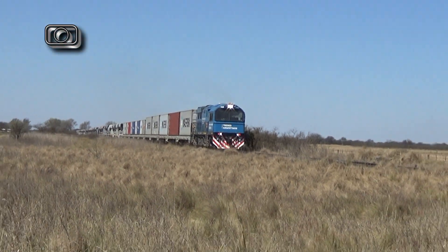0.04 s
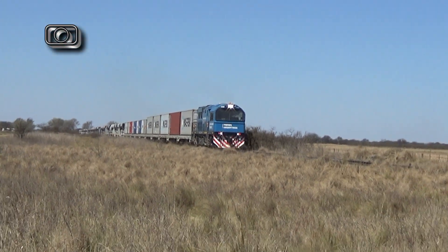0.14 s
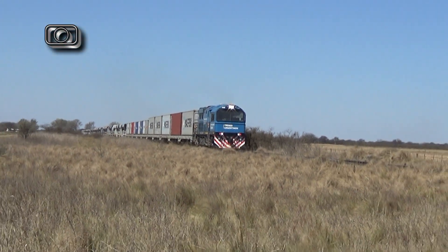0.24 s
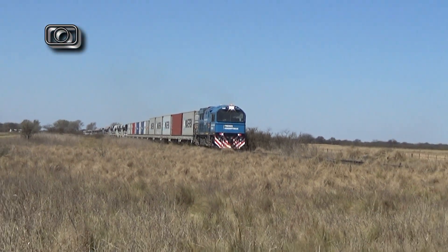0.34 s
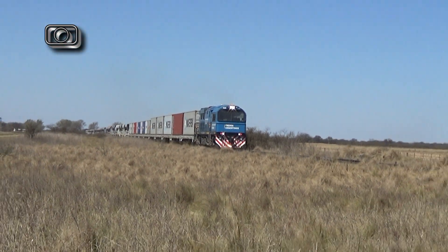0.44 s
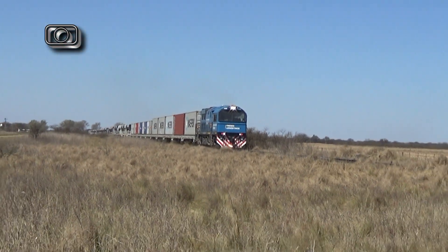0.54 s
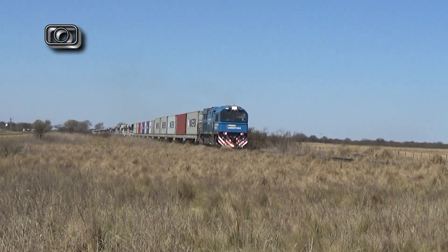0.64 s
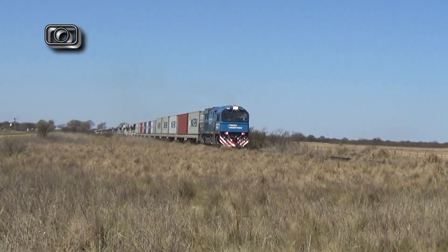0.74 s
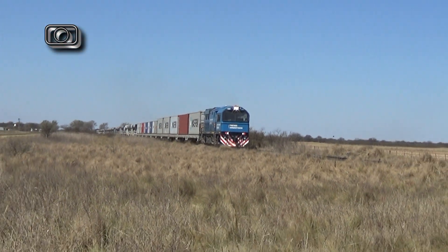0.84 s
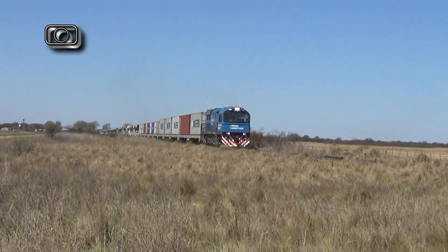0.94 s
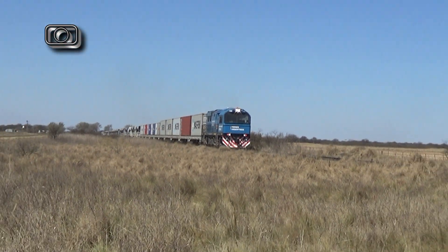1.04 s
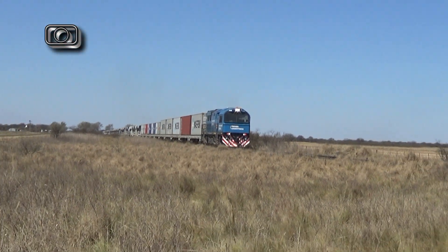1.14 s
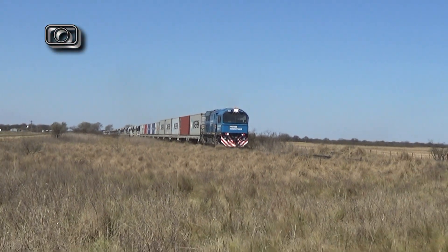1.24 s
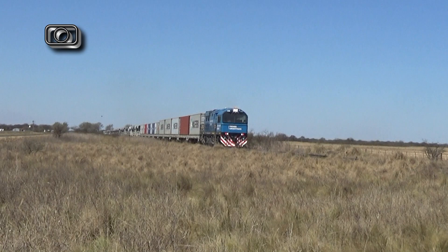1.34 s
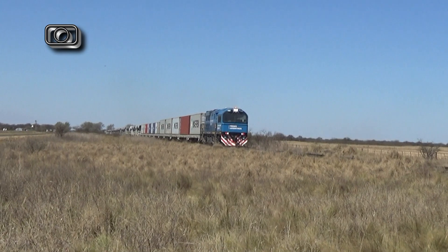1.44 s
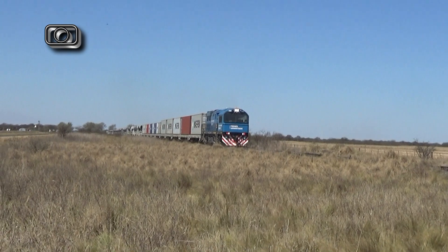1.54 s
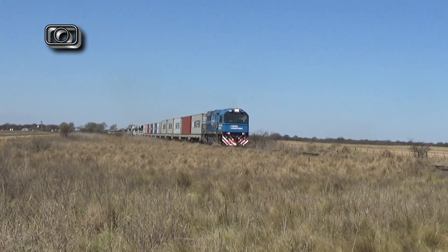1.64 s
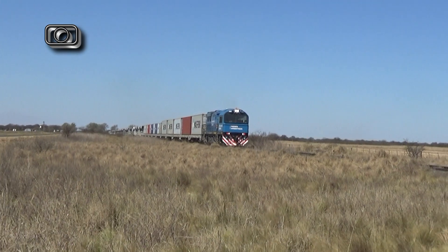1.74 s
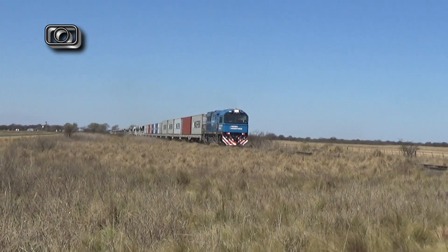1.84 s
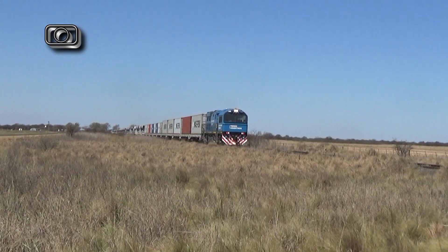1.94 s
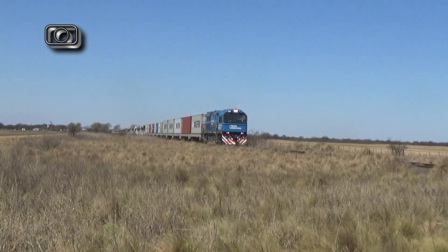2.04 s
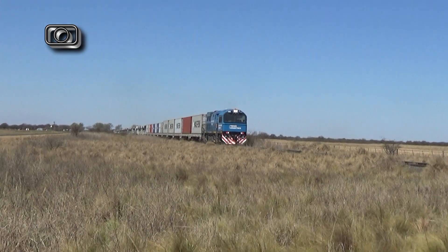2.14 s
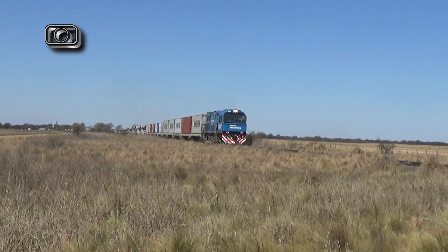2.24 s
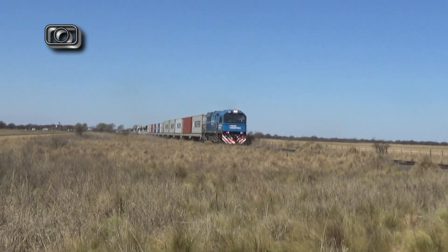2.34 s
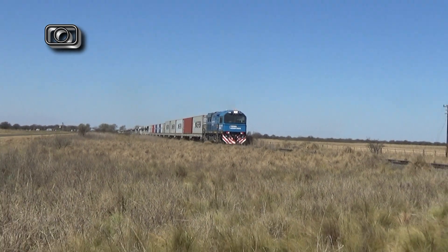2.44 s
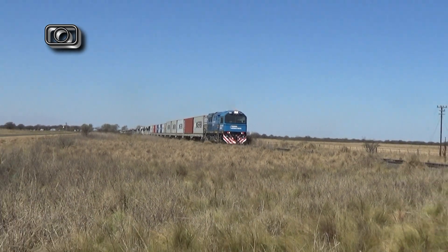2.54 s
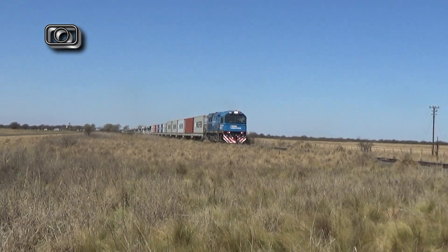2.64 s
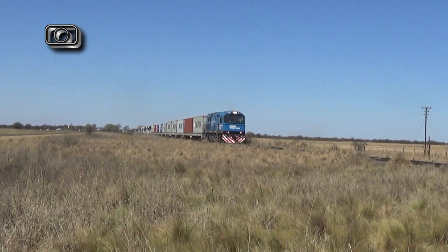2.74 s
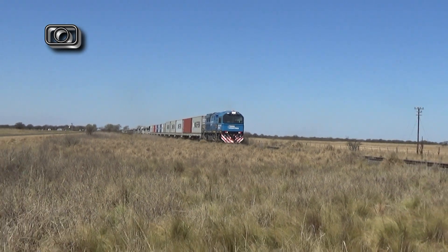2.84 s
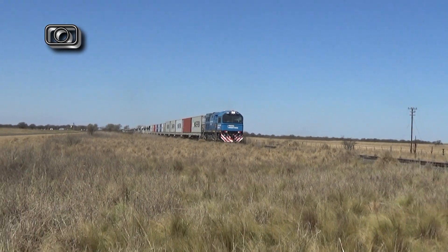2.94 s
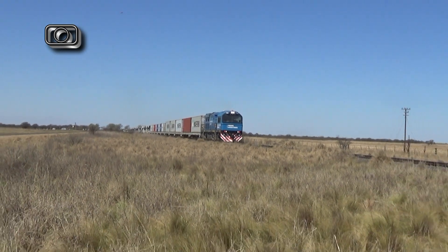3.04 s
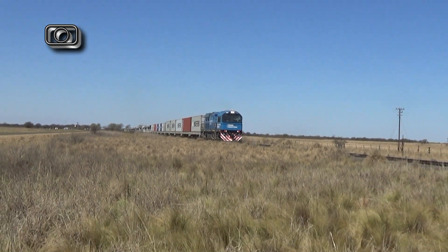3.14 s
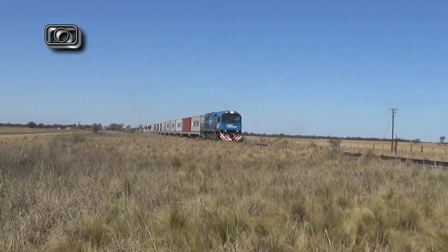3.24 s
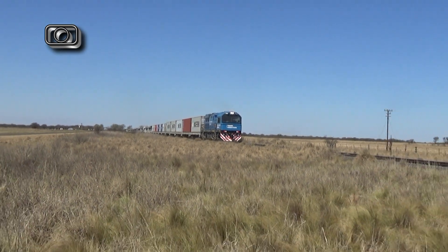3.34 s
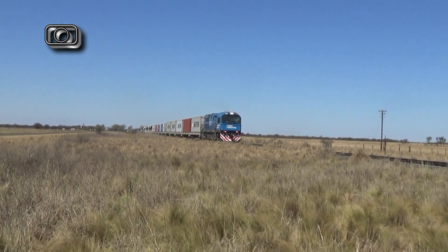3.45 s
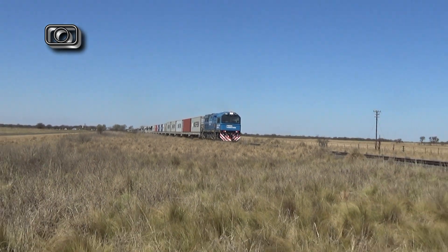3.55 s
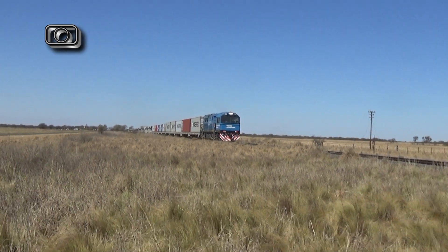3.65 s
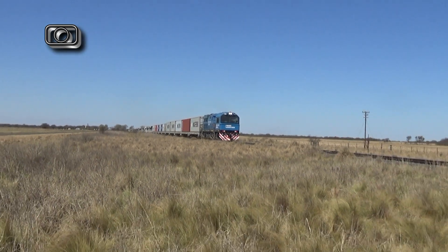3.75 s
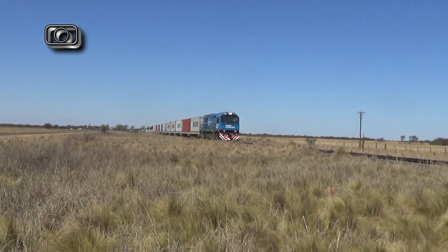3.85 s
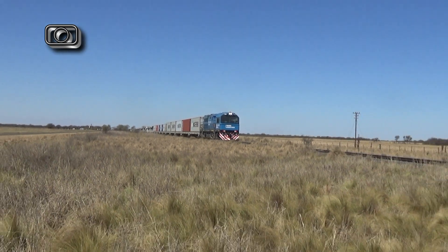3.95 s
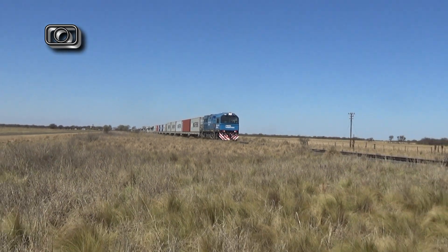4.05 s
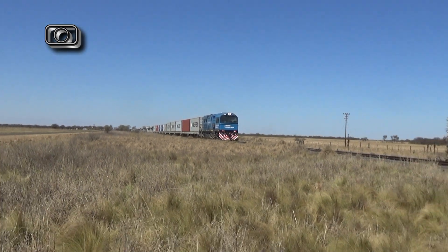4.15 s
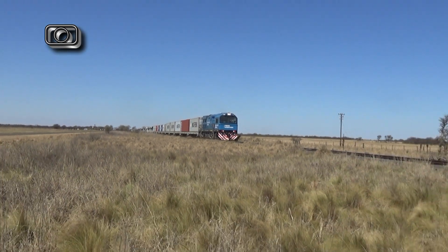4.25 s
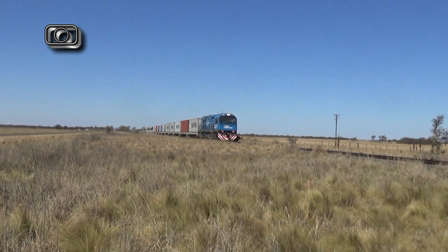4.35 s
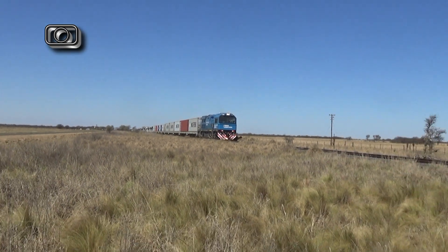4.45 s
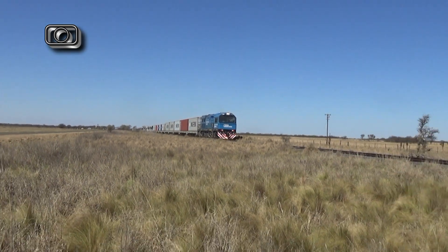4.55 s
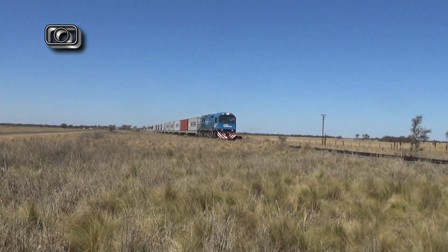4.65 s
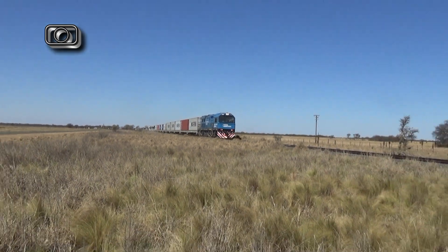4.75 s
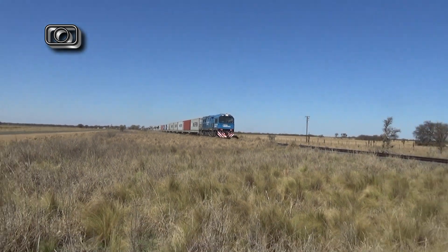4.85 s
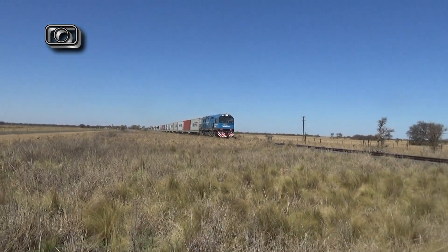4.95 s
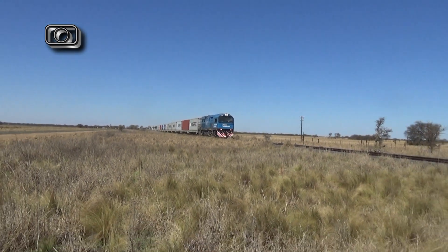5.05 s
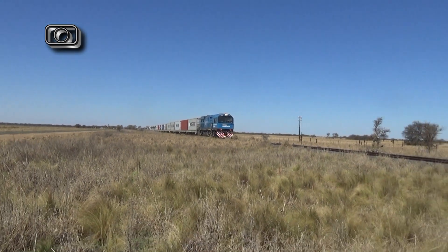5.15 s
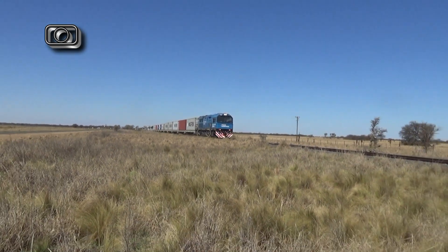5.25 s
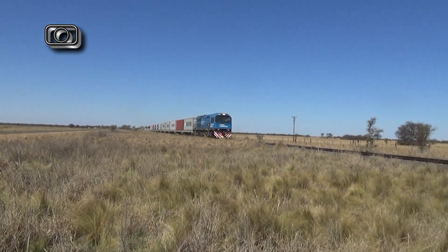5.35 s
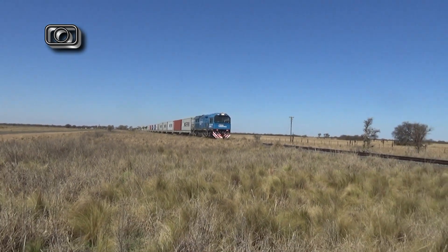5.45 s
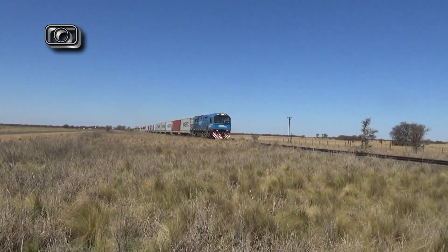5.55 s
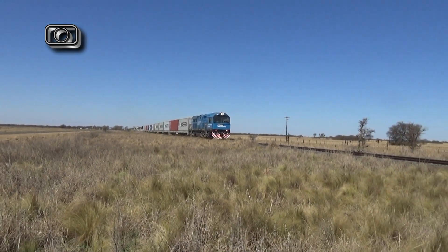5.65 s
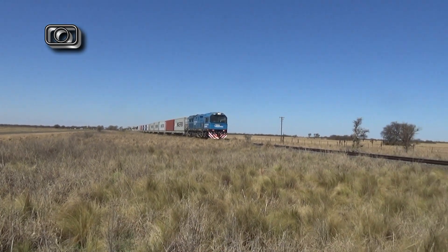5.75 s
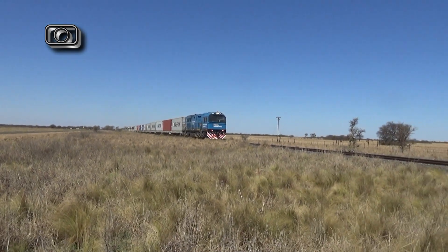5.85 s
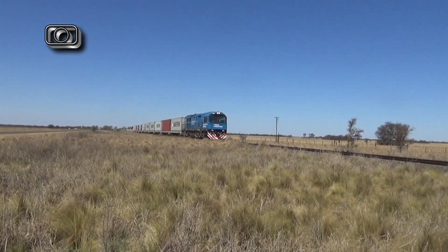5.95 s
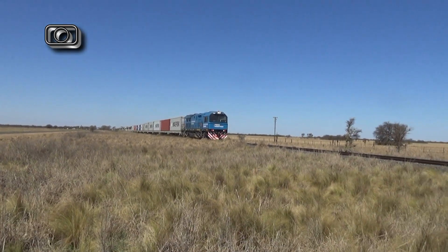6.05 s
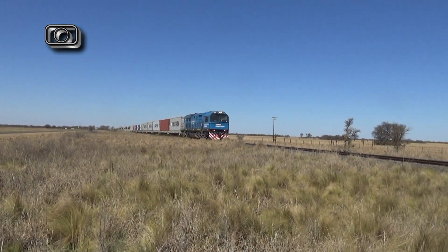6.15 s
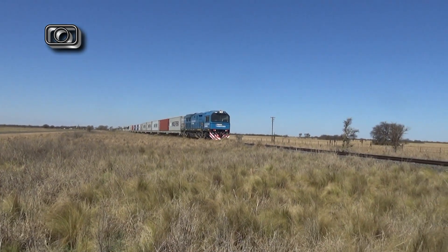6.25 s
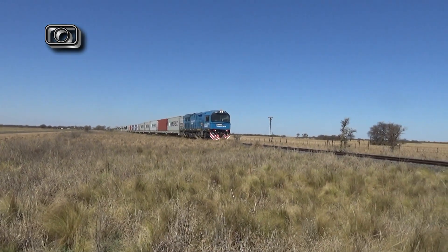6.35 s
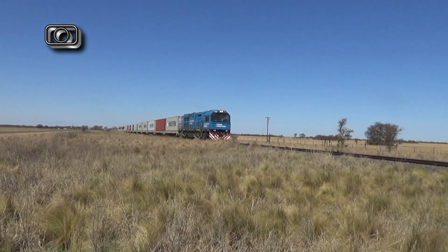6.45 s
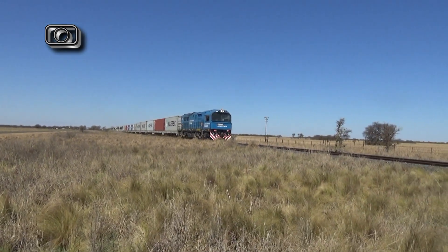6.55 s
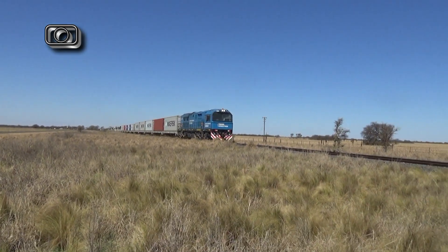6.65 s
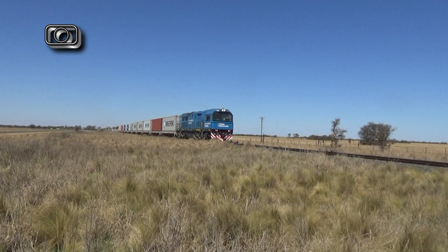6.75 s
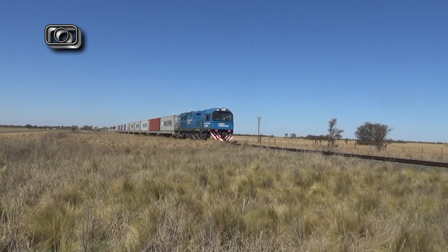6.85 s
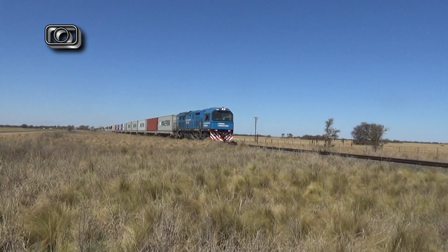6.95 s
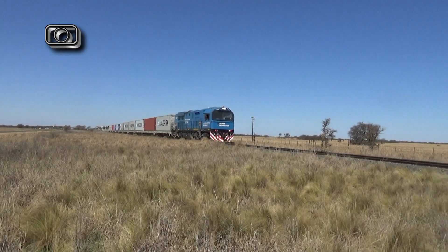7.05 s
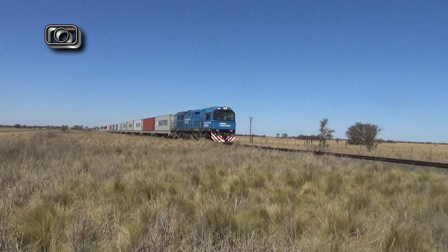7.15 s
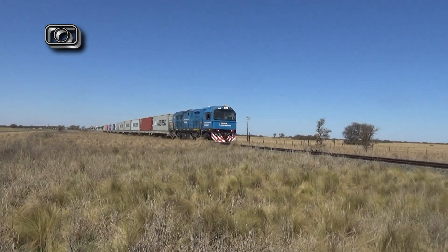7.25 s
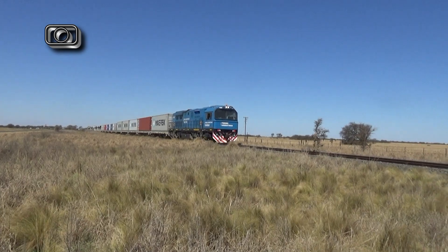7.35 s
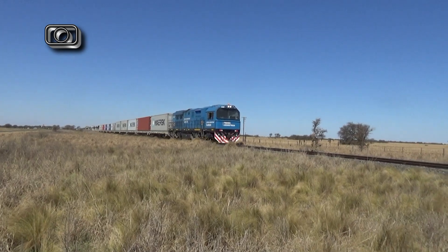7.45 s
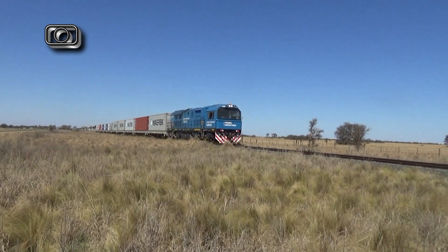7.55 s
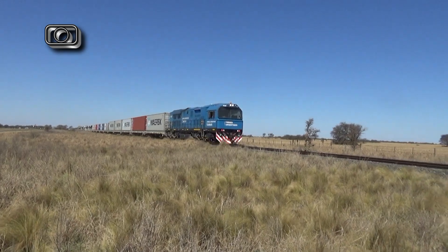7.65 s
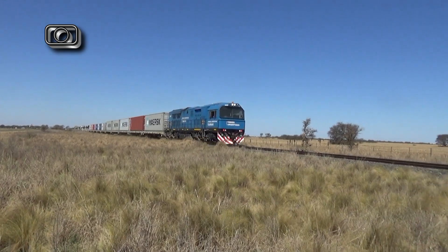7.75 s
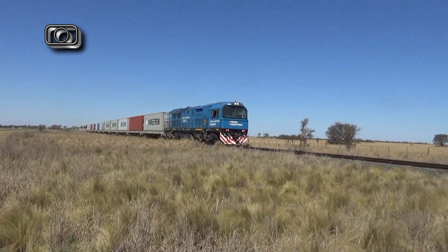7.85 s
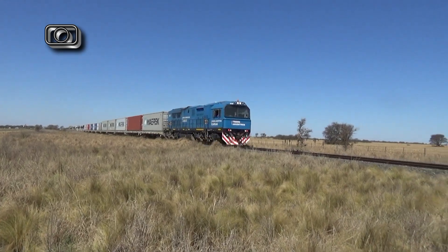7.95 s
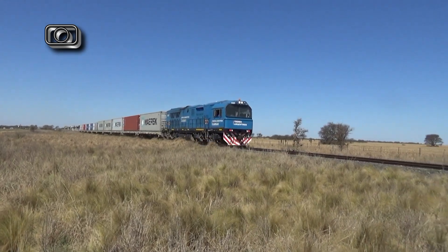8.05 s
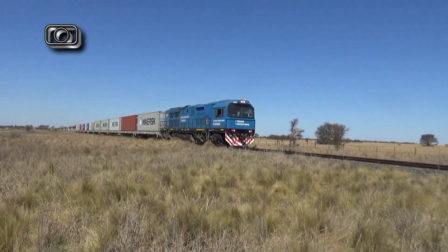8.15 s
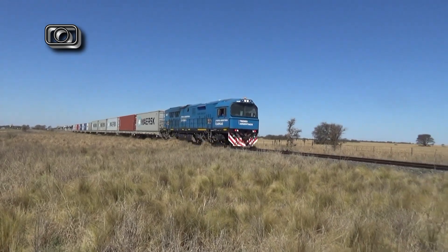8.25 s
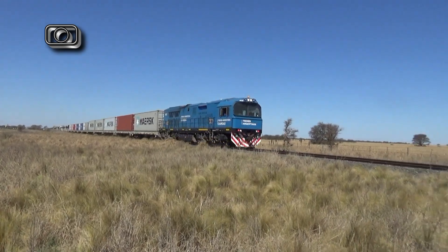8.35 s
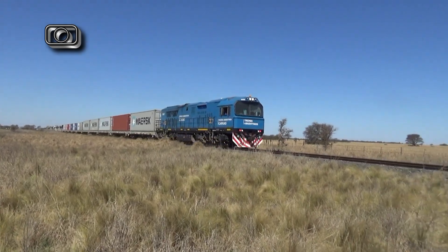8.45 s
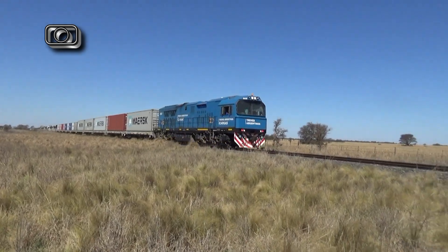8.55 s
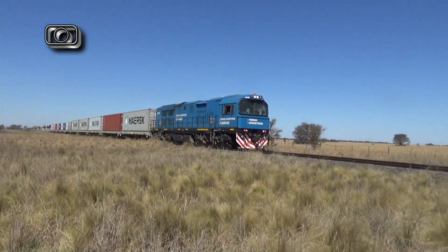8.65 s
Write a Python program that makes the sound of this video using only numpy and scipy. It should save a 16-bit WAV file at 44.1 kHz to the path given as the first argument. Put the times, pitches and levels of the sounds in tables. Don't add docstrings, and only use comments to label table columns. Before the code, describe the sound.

A diesel freight train approaches across open grassland, engine throbbing faintly at first, blows a loud two-note air horn midway, then swells to a gritty roar.

```python
import sys
import numpy as np
from scipy import signal
from scipy.fft import rfft, irfft, next_fast_len
from scipy.io import wavfile
from scipy.ndimage import uniform_filter1d

SR = 44100
rng = np.random.default_rng(int(sys.argv[2]) if len(sys.argv) > 2 else 0)


def linear_from_db(decibels):
    return 10 ** (np.asarray(decibels, float) / 20)


def int16_out(signal):
    q = np.round(np.clip(np.atleast_2d(signal).T, -1, 1) * 32767)
    wavfile.write(sys.argv[1], SR, q.astype(np.int16))


N = 383229
TIME = np.arange(N) / SR
HZ = np.maximum(np.fft.rfftfreq(next_fast_len(N + 4097) // 2 * 2, 1 / SR), 1)
COARSE = slice(None, None, 8)


def rms_one(x):
    return x / np.sqrt(np.mean(x ** 2) + 1e-20)


def in_time(rows):
    s, *columns = np.transpose(rows)
    return [np.interp(TIME, s, c) for c in columns]


def at_hz(points, hz, order=1):
    return np.interp(np.log(hz), np.log(np.array(points)[:, 0]), np.array(points)[:, order])


def shaped(x, gain):
    size = 2 * len(HZ) - 2
    return irfft(rfft(x, size) * gain, size)[..., :N]


def peaks(modes):
    return linear_from_db(sum(db / (1 + (2 * (HZ - hz) / width) ** 2) for hz, width, db in modes))


def coloured(gain, channels=1):
    return rms_one(shaped(rng.standard_normal((channels, N)), gain))


def drift(rate_hz, span=slice(None)):
    r = np.exp(-80 * np.pi * rate_hz / SR)
    slow = signal.lfilter([1], [1, -2 * r, r * r], rng.standard_normal(N // 40 + 2002))[2000:]
    return np.interp(np.arange(N)[span] / 40, np.arange(len(slow)), rms_one(slow))


def bell(x, centre, width):
    return np.exp(-.5 * ((x - centre) / width) ** 2)


# time in seconds, speed in cycles per second.
ENGINE_SPEED = [(0.72, 13.276), (1.77, 13.258), (2.82, 13.255), (3.87, 13.272), (4.92, 13.283),
                (5.97, 13.285), (7.02, 13.277), (8.07, 13.269)]


def engine_cycles():
    return np.cumsum(in_time(ENGINE_SPEED)[0]) / SR


# time in seconds, exhaust level in dB, share of the near tone colour 0-1.
APPROACH = [(0, -46, 0.0), (1, -45.5, 0.0), (2, -43.5, 0.0), (3, -41, 0), (4.2, -38, 0), (5.7, -34, 0.78),
            (6.5, -32, 0.65), (7, -29, 0.88), (7.5, -25, 0.83), (8, -22.5, 0.88), (8.4, -20.5, 1.0),
            (8.69, -19.5, 0.9)]


def approach():
    level_db, near = in_time(APPROACH)
    return level_db, near.clip(0, 1)


# multiple of the engine cycle, level in dB
# when far, level in dB when near.
EXHAUST_TONES = [(3, -23.0, -29.0), (4, -24.0, -33.0), (5, -5.0, -6.0), (6, -22.0, -23.0), (7, -13.0, -16.0),
                 (8, -9.0, -12.0), (9, -20.0, -23.0), (10, -13.0, -17.0), (11, -14.0, -12.0),
                 (12, -25.0, -24.0), (13, -14.0, -11.0), (14, -20.0, -14.0), (15, -26.0, -27.0),
                 (16, -19.0, -27.0), (17, -17.0, -20.0), (18, -14.0, -18.0), (19, -19.0, -19.0),
                 (20, -21.0, -21.0), (21, -22.0, -28.0), (22, -22.0, -21.0), (23, -32.0, -29.0),
                 (24, -25.0, -24.0),
                 (25, -27.0, -27.0), (26, -33.0, -25.0), (27, -29.0, -21.0), (28, -23.0, -20.0),
              (29, -18.0, -17.0), (30, -29.0, -23.0), (31, -28.0, -32.0), (32, -21.0, -22.0),
              (33, -28.0, -22.0), (34, -21.0, -19.0), (35, -24.0, -13.0), (36, -21.0, -19.0),
              (37, -17.0, -15.0), (38, -28.0, -19.0), (39, -17.0, -15.0), (40, -31.0, -25.0),
              (41, -30.0, -25.0), (42, -31.0, -28.0), (43, -39.0, -30.0), (44, -26.0, -23.0),
              (45, -28.0, -25.0), (46, -29.0, -29.0), (47, -26.0, -17.0)]
# place of the thump 0-1, its strength in dB,
# place of the hiss puff 0-1, its strength in dB.
PULSES = [(.0981, 5.1, .155, 0), (.1444, .6, .35, 0), (.296, .3, .53, 1), (.5889, .5, .775, 1),
          (.7959, -1.5, .93, 0)]
# pitch in Hz, dB over the exhaust when far, dB when near.
WHINES = [(765, -29, -19.5), (1182, -28, -31), (1276, -29, -20.5), (1600, -28, -43)]


def exhaust(cycles, level_db, near):
    place, strength_db = np.transpose(PULSES)[:2]
    cycles, level_db, near = cycles[COARSE], level_db[COARSE], near[COARSE]
    out = 0
    for k, far_db, near_db in EXHAUST_TONES:
        lineup = np.angle(-np.sum(linear_from_db(strength_db) * np.exp(-2j * np.pi * k * place)))
        smear = .57 + 5.5 * np.log(k / 5) + .09 * max(k - 18, 0) ** 2
        shake = k / 40
        tone_db = far_db + near * (near_db - far_db)
        gain = linear_from_db(tone_db + shake * (1.3 * drift(3.0, COARSE) + 1.5))
        phase = 2 * np.pi * k * cycles + lineup + smear + 0.2 * shake * drift(2.0, COARSE)
        out = out + gain * np.cos(phase)
    for hz, far_db, near_db in WHINES:
        gain = linear_from_db(far_db + near * (near_db - far_db) + 2.0 * drift(5.2, COARSE))
        out = out + gain * np.cos(2 * np.pi * hz * TIME[COARSE] + drift(1.6, COARSE))
    return signal.resample_poly(np.sqrt(2) * linear_from_db(level_db) * out, 8, 1)[:N]


def bursts(cycles, width):
    out = 0
    for _, _, place, db in PULSES:
        away = (cycles - place + .5) % 1 - .5
        out = out + linear_from_db(db) * bell(away, 0, width)
    return out * linear_from_db(1.6 * drift(50.0))


# frequency in Hz, level in dB per Hz.
RUMBLE = [(20, -20), (40, -9), (80, -19), (160, -11), (260, -12), (400, -5), (520, -0.5), (650, -3.5),
          (800, -19)]


def rumble(cycles, exhaust_db):
    noise = coloured(linear_from_db(at_hz(RUMBLE, HZ)) * (HZ < 1200), channels=2)
    return linear_from_db(exhaust_db - 7 + 0.37 * drift(24.0) + 0.83 * bursts(cycles, width=0.011)) * noise


ROAR_AT_HZ = [1050, 2400, 5000, 10000]
# dB against the exhaust close by, dB lost per 100 m of air and grass.
ROAR_REACH = [(-8.5, 2), (-8.0, 9.5), (-15.0, 12), (-24.5, 11.5)]
# frequency in Hz, level in dB.
ROAR_SHAPE = [(600, -7), (800, -3), (1000, 0.5), (1600, -1.5), (2400, -1.5), (3500, -1.5), (5000, 0.5),
              (7000, 6), (9000, 1.5), (12000, -3), (15500, -30)]
# frequency in Hz, width in Hz, height in dB.
BODY = [(895, 142, 7), (1489, 79, 6.5), (2120, 190, 2.5), (2380, 100, 5.5), (3070, 320, 2.5),
        (4000, 260, 1), (7200, 810, -7), (7940, 510, 4)]
# time in seconds, half length in seconds,
# centre in Hz, lift in dB.
GUSTS = [(0.11, 0.16, 2020, 12), (0.684, 0.12, 2300, 7.5), (1.11, 0.089, 2190, 6), (1.42, 0.057, 2250, 8.5),
         (1.582, 0.054, 1220, 6), (1.852, 0.073, 2400, 2.5), (2.0, 0.045, 1000, 3), (2.818, .12, 1680, 6.5),
         (3.2, 0.24, 4000, 3.5), (3.447, 0.056, 5070, 2.5), (4.223, 0.15, 2360, 6.5),
         (5.76, 0.086, 3030, 5.5), (5.918, 0.092, 5200, 4.5), (6.304, 0.14, 10200, 5.5),
         (6.6, 0.097, 5630, 7), (7.183, 0.04, 4480, 4), (7.41, 0.063, 4660, 4.5), (7.54, 0.059, 3470, 1.5),
         (7.617, 0.044, 9000, -1), (7.785, 0.11, 6670, 13), (8.05, 0.041, 2620, 2), (8.208, 0.13, 3800, 5),
         (8.469, 0.087, 6700, 14.5), (8.45, 0.2, 1550, 3), (8.678, 0.03, 8100, 5.5),
         (5.745, 0.13, 1060, 4.5), (6.45, 0.1, 1050, 3.5), (.2, 0.043, 1500, 3), (7.737, .15, 1900, 4)]
SPEED_M_S, ABREAST_S = 17, 9.5
GUST_OCTAVES, GUST_WIDENS = 0.59, 0.38


def roar(cycles, exhaust_db):
    slow_time = TIME[COARSE]
    puff = bursts(cycles, width=0.04)[COARSE]
    metres = SPEED_M_S * (ABREAST_S - slow_time)
    swells = np.array([db * bell(slow_time, s, half) for s, half, _, db in GUSTS])
    gust_hz = np.array(GUSTS)[:, 2]
    together = drift(15.0, COARSE)
    white = rng.standard_normal((2, 2, N))
    white *= linear_from_db(1.6 * np.minimum(rng.exponential(1, N), 5))
    edges = 560 * 2 ** np.arange(0, 4.9, 1 / 3)
    out = 0
    for k, (low, high) in enumerate(zip(edges, edges[1:])):
        hz = np.sqrt(low * high)
        band_pass = signal.butter(2, [low, high], "band", fs=SR, output="sos")
        band = rms_one(signal.sosfilt(band_pass, white[k % 2]))
        close_db, loss_db = [np.interp(np.log(hz), np.log(ROAR_AT_HZ), c) for c in np.transpose(ROAR_REACH)]
        gust_width = GUST_OCTAVES * (hz / 2000) ** GUST_WIDENS
        reach = bell(np.log2(hz / gust_hz), 0, gust_width)
        level_db = exhaust_db[COARSE] + close_db - loss_db * metres / 100 + reach @ swells
        depth_db = np.interp(np.log(hz), np.log([700, 5000]), [3.0, 6.0])
        patch_db = .5 * together + 1.36 * drift(10.7, COARSE) + 0.8 * drift(1.9, COARSE)
        patch_db = patch_db + depth_db * (puff - .45)
        gain = linear_from_db(level_db + at_hz(ROAR_SHAPE, hz) - 6.5 + patch_db)
        out = out + band * np.interp(TIME, slow_time, gain)
    return shaped(out, peaks(BODY))


def fan(exhaust_db):
    beam_db = 12.5 * bell(TIME, 7.25, 0.65)
    resonance = 1 / (1 + (2 * (HZ - 2330) / 380) ** 2)
    return linear_from_db(exhaust_db - 30 + beam_db + 2.9 * drift(17.0)) * coloured(resonance, channels=2)


# frequency in Hz, width in Hz, height in dB.
GROUND = [(802, 390, -8.5), (1636, 120, 4), (1950, 69, 2)]


def over_grass(noise, near):
    return near * noise + (1 - near) * shaped(noise, peaks(GROUND))


# (opens s, closes s, pitch settles in s)
HIGH_BLAST = (4.307, 5.54, .018)
LOW_BLASTS = [(4.324, 4.665, .036), (4.86, 5.225, .018)]
ATTACK_S, ATTACK_DB = .011, 20
STALL_SHARE, STALL_DB = .86, 22


def trumpet(blast, law, blow, tones, tracked, lead, flare, flip=0):
    opens, closes, settle = blast
    steady, sharp, sag, glide = law
    level_db, brighten_db, octave_db, octave_sag_db, release, drop_db, power, dull_db = blow
    span = slice(round(opens * SR), round((closes + release) * SR))
    since = TIME[span] - opens
    rising = (1 - since / ATTACK_S).clip(0)
    dying = ((TIME[span] - closes) / release).clip(0)
    stalled = (20 * (dying - STALL_SHARE)).clip(0, 1)
    tilt_db = brighten_db * since - 5.0 * rising - dull_db * dying + .25 * drift(5.0, span)
    pitch = steady + sharp * np.exp(-since / settle) - sag * since + glide * dying ** 1.4
    wobble = 1 + .0003 * drift(30.0, span)
    turn = 2 * np.pi * np.cumsum(pitch * wobble / tracked) / SR
    out = np.zeros(N, complex)
    for k, db in tones:
        flutter_db = .14 * k ** .9 * drift(12.0, span)
        phase = k * turn + lead + flare * k * k + flip * (k == 1)
        colour_db = tilt_db * np.log2(k / tracked) - STALL_DB * stalled * np.log2(k)
        colour_db -= 9.0 * dying * max(np.log2(k / 6), 0)
        if k == 2 * tracked:
            colour_db += octave_db - octave_sag_db * since * (1 - 1.07 * dying)
        out[span] += linear_from_db(db + colour_db + flutter_db) * np.exp(1j * phase)
    level = linear_from_db(level_db - ATTACK_DB * rising - drop_db * dying ** power)
    out[span] *= np.sqrt(2) * level * signal.windows.tukey(len(turn), 120 / len(turn))
    return out


def gate(opens, closes, rise_s, fall_s):
    return np.minimum((TIME - opens) / rise_s, 1 - (TIME - closes) / fall_s).clip(0, 1)


def low_open():
    return sum(gate(opens, closes - .018, .011, .044) for opens, closes, _ in LOW_BLASTS)


# multiple of its pitch, level in dB.
HIGH_TONES = [(1, 1), (2, -5), (3, -3.5), (4, -6.5), (5, -12), (6, -20), (7, -21), (8, -19), (9, -17.5),
              (10, -25), (11, -38), (12, -29.5), (13, -31.5), (14, -38), (15, -31), (16, -36.5), (17, -39),
              (18, -35), (19, -42), (20, -41), (21, -49), (22, -44)]
# multiple of half the tracked pitch, level in dB.
LOW_TONES = [(1, -9), (2, 4), (3, 1.5), (4, -7.5), (5, -20.5), (6, -18), (7, -13.5), (8, -14.5), (9, -13),
             (10, -15), (11, -20), (12, -29), (13, -23.5), (14, -20.5), (15, -20), (16, -21), (17, -18.5),
             (18, -34), (19, -41), (20, -43), (21, -22), (22, -30), (23, -40), (24, -23.5)]
# multiple as above, level in dB.
LOW_THROB = [(1, -6), (2, 0), (3, -15)]
# frequency in Hz, level in dB per Hz.
HORN_AIR = [(300, -14), (700, -2), (2000, -0.5), (4000, -5), (7000, -3), (11000, -15), (15000, -34)]
# delay in seconds, level in dB.
HORN_ECHOES = [(.0093, -44), (.021, -58)]
# (steady Hz, sharp at first Hz, sag Hz per s, glide as the air runs out Hz)
HIGH_LAW, LOW_LAW = (684.3, 8, -.25, 36), (768.8, 23, 7, -5)
# (level dB, brightening dB per octave per s, octave tone at first dB, its sag dB per s)
HIGH_BLOW, LOW_BLOW = (-18.5, 0.75, 3, 7), (-23.5, -1, 1.5, 17)
# (release s, drop dB, curve power, dulling dB per octave)
HIGH_END, LOW_END = (.096, 25, 4.2, .8), (.058, 30, 1.4, 5)


def low_trumpet(tones):
    return sum(trumpet(blast, LOW_LAW, LOW_BLOW + LOW_END, tones, 2, 1, .75) for blast in LOW_BLASTS)


def horn():
    high = trumpet(HIGH_BLAST, HIGH_LAW, HIGH_BLOW + HIGH_END, HIGH_TONES, 1, -2.75, 0, np.pi)
    high = linear_from_db(-5.5 * low_open()) * high
    low = low_trumpet(LOW_TONES)
    mixed = (high * low_trumpet(LOW_THROB)).real
    mixed = linear_from_db(4) * shaped(mixed, np.sqrt(1 + (HZ / 2500) ** 2))
    effort = np.sqrt(uniform_filter1d(abs(high) ** 2 + linear_from_db(9) * abs(low) ** 2, size=400).clip(0))
    air = linear_from_db(-25.0) * effort * coloured(linear_from_db(at_hz(HORN_AIR, HZ)))[0]
    pop = linear_from_db(-5.5) * bell(TIME, 4.3125, 0.00066) * np.sin(2 * np.pi * 1480 * TIME)
    echoes = 1 + sum(linear_from_db(db) * np.exp(-2j * np.pi * HZ * s) for s, db in HORN_ECHOES)
    return shaped((high + low).real + mixed + air + pop, echoes)


# time in seconds, pitch in Hz, peak in dB.
CHIRPS = [
    (.6593, 7740, -60),
    (.6607, 8000, -50),
    (.6622, 8300, -51),
    (.6643, 8600, -51),
]


def insect():
    return sum(linear_from_db(db) * bell(TIME, s, .0005) * np.sin(2 * np.pi * hz * TIME) for s, hz, db in CHIRPS)


def wind():
    return linear_from_db(-59 + 2.3 * drift(3.0)) * coloured(1 / (1 + (HZ / 45) ** 4) / (1 + (30 / HZ) ** 4))[0]


# frequency in Hz, level in dB per Hz.
HISS = [(1760, -39), (3000, 1), (3740, -2), (15500, -9)]


def circuit_hiss():
    shared, opposed = coloured(linear_from_db(at_hz(HISS, HZ)), channels=2) * linear_from_db([[-68], [-75]])
    return shared + opposed * [[1], [-1]]


def gain_control():
    opens, closes, _ = HIGH_BLAST
    rest_db, after_db, fall_s, rise_s = 3.5, -0.24, 0.043, 0.066
    settled_db = (after_db - rest_db) * gate(opens, N / SR, fall_s, 1)
    high_db = -6.0 * gate(opens, closes, fall_s, rise_s)
    return linear_from_db(rest_db + settled_db + high_db - 3.5 * low_open())


# frequency in Hz, radians the left leads when the source is ahead,
# radians when it is aside, left-right difference in dB, unshared sound in dB.
PORTS = [(30, .1, .35, 1.0, -14), (66, .17, .64, 1.0, -26), (150, .38, 1.12, 1.0, -24),
         (380, .88, 1.43, .3, -22), (750, 1.0, 1.28, .1, -18), (1300, .76, .9, .2, -17),
         (2050, .5, .52, .6, -14), (4100, .4, .42, .3, -11), (6200, .2, .33, .4, -10),
         (8200, .13, .1, .9, -13), (14000, .01, .01, .3, -17)]


def microphones(mid, unshared, aside, lean_share):
    ahead_side, aside_side = [shaped(mid, 1j * np.tan(at_hz(PORTS, HZ, order=k) / 2)) for k in (1, 2)]
    lean = lean_share * shaped(mid, np.tanh(at_hz(PORTS, HZ, order=3) * np.log(10) / 40))
    stray = shaped(unshared, linear_from_db(at_hz(PORTS, HZ, order=4)))
    side = ahead_side + aside * (aside_side - ahead_side) + lean + stray
    return np.array([mid + side, mid - side])


def scene():
    cycles = engine_cycles()
    level_db, near = approach()
    noise = rumble(cycles, level_db) + roar(cycles, level_db) + fan(level_db)
    noise = over_grass(noise, near)
    duck = gain_control()
    mid = duck * (exhaust(cycles, level_db, near) + noise[0] + wind()) + insect()
    aside = np.interp(TIME, [0, 5.4, 6.5, 7.9], [0, .05, .45, 1])
    train = microphones(mid, duck * noise[1], aside, .35 + 1.3 * aside)
    blast = microphones(horn(), np.zeros(N), .05, .2) * linear_from_db([[-.3], [.3]])
    return train + blast + duck * circuit_hiss()


def roll_off(x):
    return signal.sosfilt(signal.butter(12, 15640, fs=SR, output="sos"), x)


def record(dry):
    rounded = 0.78 * np.tanh(dry / 0.84)
    mix = shaped(rounded, 1 / np.sqrt(1 + (HZ / 14800) ** 30))
    return roll_off(mix)


dry = scene()
out = record(dry)
int16_out(out)
```